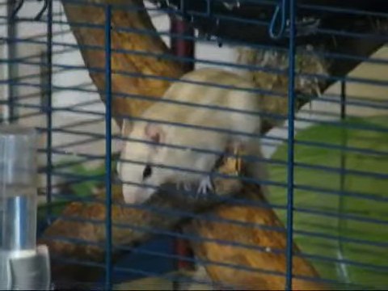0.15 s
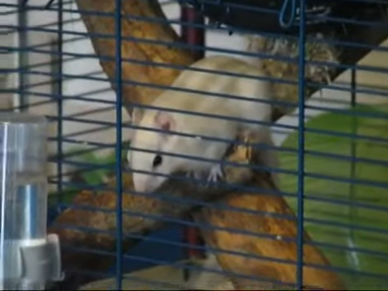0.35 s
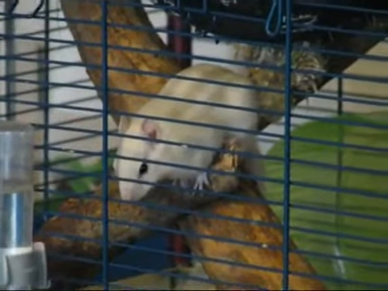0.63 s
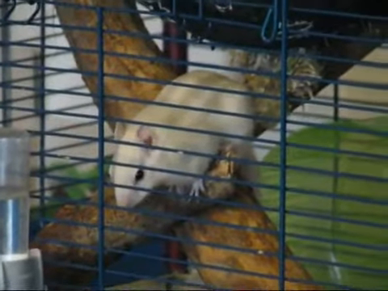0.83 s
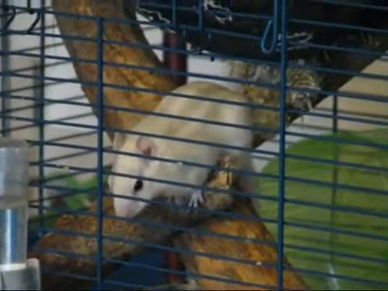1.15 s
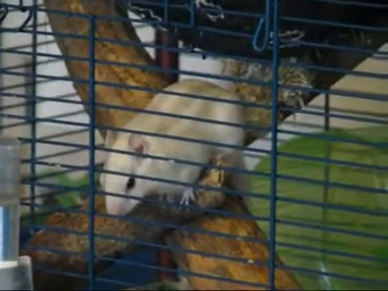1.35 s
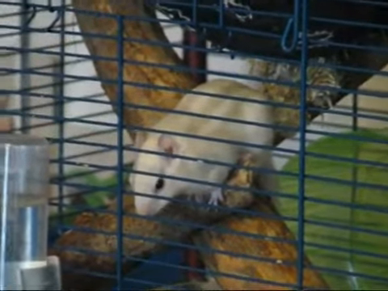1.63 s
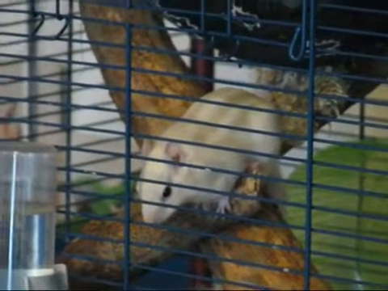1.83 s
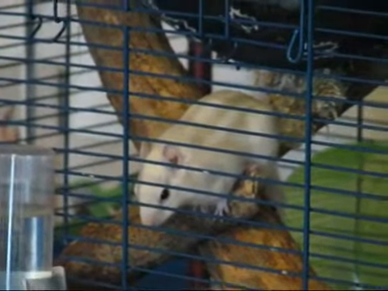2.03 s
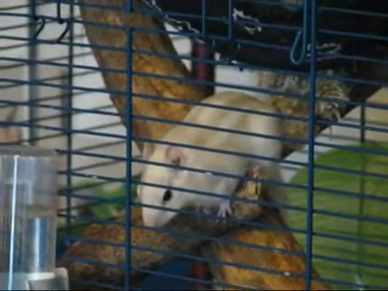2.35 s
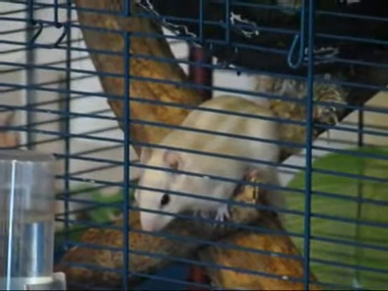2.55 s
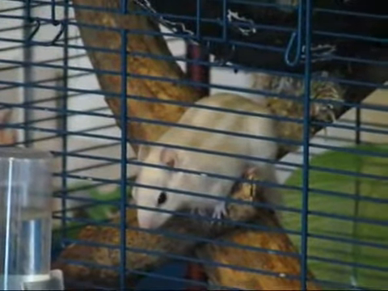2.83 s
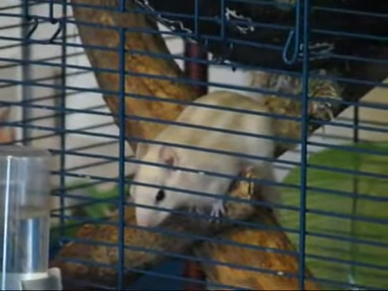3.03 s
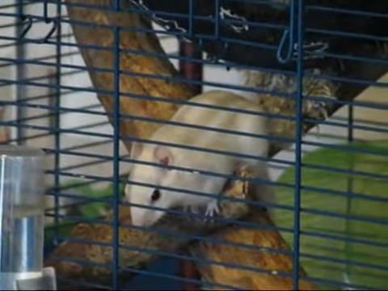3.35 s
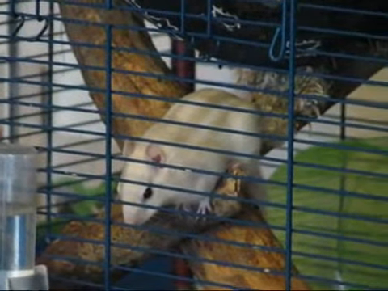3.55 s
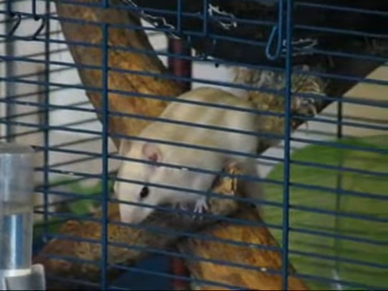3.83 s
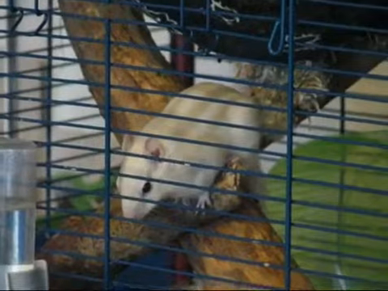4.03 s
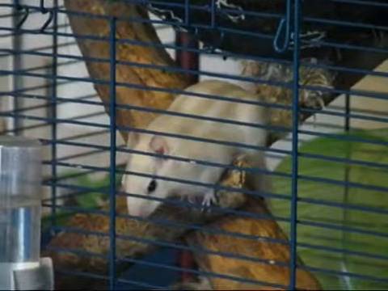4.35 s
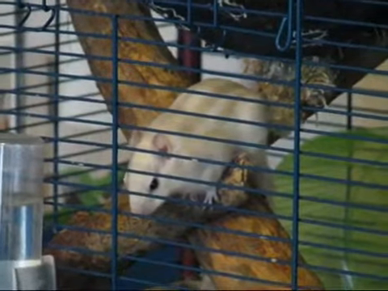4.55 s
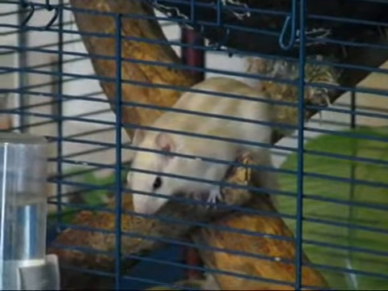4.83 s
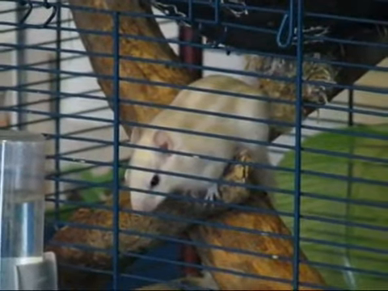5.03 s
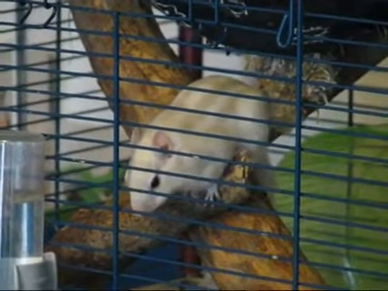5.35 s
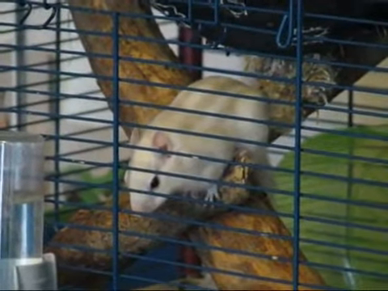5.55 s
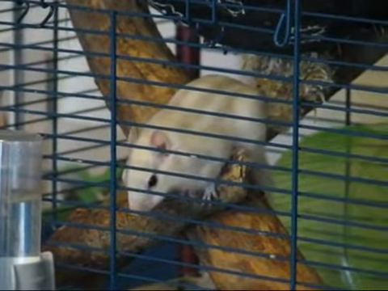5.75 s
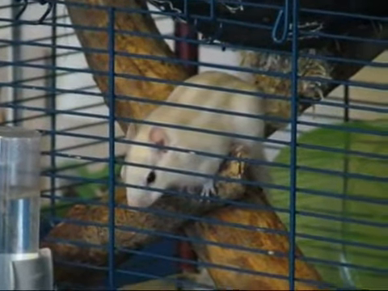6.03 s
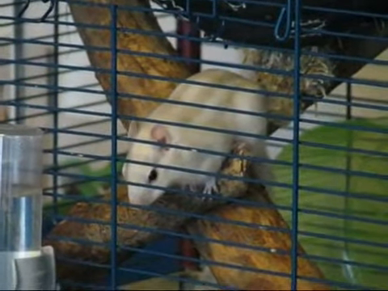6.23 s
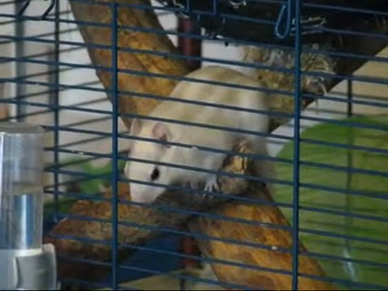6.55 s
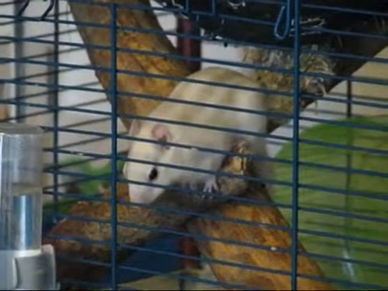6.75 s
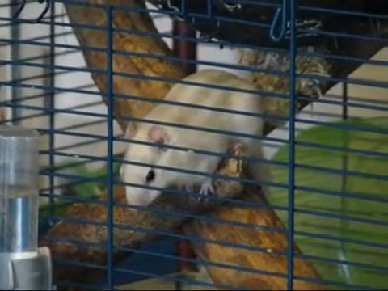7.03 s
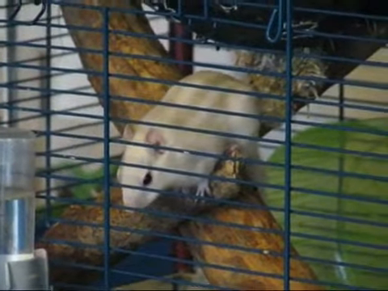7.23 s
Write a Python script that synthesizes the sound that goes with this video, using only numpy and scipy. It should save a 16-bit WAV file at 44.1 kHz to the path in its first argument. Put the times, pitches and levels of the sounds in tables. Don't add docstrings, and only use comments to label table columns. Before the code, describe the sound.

A small caged animal utters seven isolated, extremely high whistled chirps about a second or so apart. Each is a tiny arch, rising quickly and falling steeply, with slight breathiness and a short bright room ring. Behind lie low house rumble, soft hiss, distant appliance hum and a thin steady whine. A dull floor bump follows the fifth chirp. The close stereo microphone's automatic gain dips the background after every chirp.

```python
import sys
import numpy as np
from scipy import signal
from scipy.fft import rfft, irfft
from scipy.io import wavfile
from scipy.ndimage import uniform_filter1d

SR = 44100
rng = np.random.default_rng(int(sys.argv[2]) if len(sys.argv) > 2 else 0)


def volts(x):
    e = np.asarray(x, float) / 20
    return 10 ** e


def digitize_waveform(pressure):
    field = np.atleast_2d(pressure).T
    bounded = np.clip(field, -1, 1)
    quanta = np.round(bounded * 32767).astype(np.int16)
    wavfile.write(sys.argv[1], SR, quanta)


N = 325458

# (time of top [s], rise [s], fall [s], top pitch [Hz], end pitch [Hz])
CHIRP_ARCHES = [
    (0.5275, 0.012, .0255, 11080, 7506),
    (1.5589, .013, .023, 10530, 5589),
    (2.9487, .0145, 0.025, 10540, 6450),
    (4.4850, .0177, .0173, 9279, 6095),
    (5.3731, .014, .022, 10040, 5555),
    (6.6689, .013, .026, 10640, 5969),
    (7.2554, .0125, .022, 9731, 4975),
]
# (level [dB], onset softness [-], hang before drop [-], octave [dB], room [dB])
CHIRP_DELIVERY = [(-13.5, 1.4, 1.1, -43.5, 3), (-15, 1.6, .9, -20.5, 3.5), (-14.5, 1.9, .92, -22, 3),
                  (-13, .6, 1.1, -19.5, 1.98), (-14.5, 1.4, 1.05, -17.5, 3.5), (-14, 1.9, 1.6, -20.5, 4.5),
                  (-14.5, 1.35, .8, -18, -1)]
PITCH_DROP = [(.27, .2), (.57, 0.419), (.8, .85), (1.0, 1)]
# (pitch [Hz], gain [dB])
MOUTH_GAIN = [(5500, .5), (6400, -4), (7400, 0.5), (8400, 2.5), (9400, -4.5), (10000, 0), (10600, -1.5),
              (11100, 0.93)]
# (left delay [ms], right delay [ms], left level [dB], right level [dB])
SURFACE_ECHOES = [(2.4, 2.3, -18, -18), (2.8, 3.1, -17, -19), (4.0, 3.8, -19, -19), (6.5, 7.5, -17, -17),
                  (10.1, 9.8, -16, -16)]
# (frequency [Hz], left minus right [dB])
MIC_LEAN = [(5000, 5), (6500, 3), (7500, 6), (8500, 2), (9700, -4.5), (10800, -8.5), (12000, 1),
            (15000, 1.5)]
# (low edge [Hz], high edge [Hz], t60 [s], level [dB])
ROOM_TAIL_BANDS = [(2976, 4600, 0.27, -11.5), (6873, 7639, 0.2477, -20), (7714, 9500, 0.2548, -22),
                   (9220, 12000, 0.25, -31), (11470, 13500, 0.27, -18.5), (13400, 15500, 0.19, -23.5)]
# (time [s], frequency [Hz], level [dB], t60 [s])
BUMP_MODES = [
    (1.929, 95, -49, 0.41),
    (5.539, 103.4, -43.5, 0.55),
    (5.57, 78.5, -34, 0.15),
    (5.621, 40.34, -43, 0.64),
]
# (on [s], off [s], level [dB])
HUM_RUNS = [
    (4.8, 5.15, -62),
    (5.85, 7.25, -59.5),
]
# (on [s], off [s], level [dB])
WHISTLE_RUNS = [
    (-.2, 1.38, -77.5),
    (2.35, 3.3, -76.5),
]
# (frequency [Hz], width [Hz], level [dB])
AIR_DRONES = [(37.2, 9.5, -62.5), (95, 17, -66.5), (165.3, 63, -65.5), (211.9, 18, -71), (742, 40, -77.5),
              (1030.1, 130, -74.5), (1819, 440, -76), (2342, 250, -78.5), (4184.8, 1400, -78.5),
              (7143, 200, -86.5)]
# (frequency [Hz], density [dB per Hz])
HOUSE_SPECTRUM = [(12, -30), (20, -1.5), (43, -11), (65, -12.5), (93, -9.5), (216, -8.5), (460, -15.5),
                  (1040, -16), (1230, -19.5), (2210, -22.5), (6220, -29.5), (8230, -29), (8950, -25.5),
                  (14800, -43), (16100, -58)]
# (time [s], level [dB])
HOUSE_LEVEL = [(0.0, -60), (2.3, -59), (3.3, -60.5), (7.38, -61)]
# (frequency [Hz], correlation [-])
HOUSE_LIKENESS = [(60, 0.98), (150, 1), (380, 0.84), (950, 0.7517), (2380, 0.35), (5980, 0.13),
                  (15000, 0.11)]
# (frequency [Hz], rms level [dB])
WHINE_LINES = [(8006.4, -71.5), (7840, -93.5), (8043, -91.5)]


def squirrel():
    out = np.zeros((2, N + 40000))
    for row, delivery in zip(CHIRP_ARCHES, CHIRP_DELIVERY):
        at, sound = chirp(row, delivery, room_tail())
        out[:, at:at + sound.shape[1]] += sound
    return out[:, :N]


def chirp(row, delivery, tail):
    level_db, softness, hang, octave_db, room_db = delivery
    octave_tilt_db = -22
    breath_db, rasp_db, rasp_hz, grit_db = -36.5, -28, 3200, 4.5
    perch_ms, perch_left_db, perch_right_db = 1.437, -1.5, -0.5
    pan_db = -2.67

    t = row[0] - 0.022 + np.arange(4096) / SR
    pitch_hz, level = arch(t, row, level_db, softness, hang)
    phase = 2 * np.pi * np.cumsum(pitch_hz) / SR
    octave = level * volts(octave_db + octave_tilt_db * np.log2(pitch_hz / 6000))

    grit = volts(grit_db * np.repeat(rng.standard_normal(len(t) // 32), 32))
    lowpass = signal.butter(4, rasp_hz, fs=SR, output="sos")
    flutter = rms_one(signal.sosfilt(lowpass, rng.standard_normal(len(t))))
    breath = volts(breath_db) * grit * level * bandpass(rng.standard_normal(len(t)), 1, 1200, 7000)

    def late(v, ms):
        return np.interp(t - ms / 1000, t, v)

    def heard(ms):
        angle = late(phase, ms)
        return late(level, ms) * np.sin(angle) + late(octave, ms) * np.sin(2 * angle)

    direct = heard(0) * (1 + volts(rasp_db) * flutter) + breath
    perch = heard(perch_ms)
    left = direct + volts(perch_left_db) * perch
    right = direct + volts(perch_right_db) * perch
    for left_ms, right_ms, left_db, right_db in SURFACE_ECHOES:
        left = left + volts(left_db) * heard(left_ms)
        right = right + volts(right_db) * heard(right_ms)
    near = np.array([left, right]) * volts([[pan_db / 2], [-pan_db / 2]])

    wet = volts(room_db) * signal.fftconvolve(heard(0)[None], tail, axes=1)
    wet[:, :len(t)] += near
    size = wet.shape[1]
    lean_db = at_hz(MIC_LEAN, np.fft.rfftfreq(size, 1 / SR) + 1) / 2
    return round(t[0] * SR), irfft(rfft(wet) * volts([lean_db, -lean_db]), size)


def arch(t, row, level_db, softness, hang):
    top_s, rise_s, fall_s, top_hz, end_hz = row
    start_share = 0.72
    linger_s, linger_db = 0.0058, -18
    start_db, catch_s, catch_db, attack_s = -35.5, 0.0025, -8, 0.007
    start, end = top_s - rise_s, top_s + fall_s

    climbed = np.sin(np.pi / 2 * np.clip((t - start) / rise_s, 0, 1)) ** softness
    when, down = np.transpose([(0, 0), *PITCH_DROP])
    drop_s = top_s + fall_s * when
    dropped = np.interp(t, [*drop_s, drop_s[-1] + linger_s], [*down ** hang, 1])
    hz = top_hz * (start_share + (1 - start_share) * climbed) - (top_hz - end_hz) * dropped
    pitch_hz = uniform_filter1d(uniform_filter1d(hz, size=110), size=110)

    caught = start + catch_s
    effort_s = [start, caught, caught + attack_s * softness, end, end + linger_s, end + 2 * linger_s]
    effort_db = np.interp(t, effort_s, [start_db, catch_db * softness, 0, 0, linger_db, -65], left=-75)
    total_db = level_db + effort_db + at_hz(MOUTH_GAIN, pitch_hz)
    return pitch_hz, volts(uniform_filter1d(total_db, size=60))


def room_tail():
    build_s, likeness = 0.0062, 0.2
    t = np.arange(28673) / SR
    mid, side = rng.standard_normal((2, len(t)))
    pair = stereo(mid, side, likeness) / np.sqrt(2)
    out = 0
    for low_hz, high_hz, t60_s, db in ROOM_TAIL_BANDS:
        out = out + volts(db - 60 * t / t60_s) * bandpass(pair, 2, low_hz, high_hz)
    return out * (1 - np.exp(-t / build_s))


def appliances():
    hum_hz, whistle_hz, whistle_width_hz = 73.093, 2209.4, 80
    t, white = np.arange(N) / SR, rng.standard_normal(N)
    drones = sum(volts(db) * rms_one(resonance_twice(white, hz, width_hz)) for hz, width_hz, db in AIR_DRONES)

    hum_phase = 2 * np.pi * np.cumsum(hum_hz + 1.2 * drift(1.5)) / SR
    hum = running(HUM_RUNS, idle_db=-85.5, ramp_s=0.19) * np.sin(hum_phase) * np.sqrt(2)
    thin = rms_one(resonance_twice(white, whistle_hz, whistle_width_hz))
    whistle = running(WHISTLE_RUNS, idle_db=-84, ramp_s=0.281) * thin

    bump = 0
    for at_s, hz, db, t60_s in BUMP_MODES:
        since = np.maximum(t - at_s, 0)
        swell = 1 - np.exp(-since / 0.0117)
        bump = bump + volts(db - 60 * since / t60_s) * swell * np.sin(2 * np.pi * hz * since)

    aside = volts(-16.5) * np.roll(drones, 9000) * [[1], [-1]]
    return drones + aside + hum + whistle + bump


def house(patchy_db):
    air_low_hz, air_high_hz, air_db = 13000, 15700, -81.5
    out, together = 0, drift(3.5)
    edges_hz = 18 * 2 ** np.arange(0, 10.1, 0.5)
    white = rng.standard_normal((2, 2, N))
    for k, (low_hz, high_hz) in enumerate(zip(edges_hz, edges_hz[1:])):
        mid, side = bandpass(white[k % 2], 2, low_hz, high_hz)
        hz = np.sqrt(low_hz * high_hz)
        flicker_db = patchy_db * (1.1 * together + drift(7.2))
        gain = volts(at_hz(HOUSE_SPECTRUM, hz) + flicker_db)
        out = out + gain * stereo(mid, side, at_hz(HOUSE_LIKENESS, hz))
    air = bandpass(rng.standard_normal((2, N)), 4, air_low_hz, air_high_hz)
    return in_time(HOUSE_LEVEL) * rms_one(out) + volts(air_db) * rms_one(air)


def whine():
    t = np.arange(N) / SR
    tone = 0
    for hz, db in WHINE_LINES:
        tone = tone + volts(db + 0.95 * drift(3)) * np.sqrt(2) * np.sin(2 * np.pi * hz * t)
    return tone * volts([[-1.5], [1.5]])


def running(rows, idle_db, ramp_s):
    t = np.arange(N) / SR
    gain = volts(idle_db)
    for on_s, off_s, db in rows:
        inside = np.clip(np.minimum(t - on_s, off_s - t) / ramp_s + 0.5, 0, 1)
        gain = gain + volts(db) * np.sin(np.pi / 2 * inside) ** 2
    return gain


def at_hz(points, hz):
    table_hz, value = np.transpose(points)
    return np.interp(np.log(hz), np.log(table_hz), value)


def in_time(rows):
    return volts(np.interp(np.arange(N) / SR, *np.transpose(rows)))


def rms_one(x):
    return x / np.sqrt(np.mean(x ** 2) + 1e-20)


def bandpass(x, order, low_hz, high_hz):
    return signal.sosfilt(signal.butter(order, [low_hz, high_hz], "band", fs=SR, output="sos"), x)


def stereo(mid, side, likeness):
    alike = np.clip(likeness, -1, 1)
    return np.sqrt(1 + alike) * mid + np.sqrt(1 - alike) * side * [[1], [-1]]


def drift(rate_hz):
    r = np.exp(-80 * np.pi * rate_hz / SR)
    slow = signal.lfilter([1], [1, -2 * r, r * r], rng.standard_normal(N // 40 + 2002))[2000:]
    return np.interp(np.arange(N) / 40, np.arange(len(slow)), rms_one(slow))


def resonance_twice(x, hz, width_hz):
    r = np.exp(-np.pi * width_hz / SR)
    b = [(1 - r * r) / 2, 0, (r * r - 1) / 2]
    a = [1, -2 * r * np.cos(2 * np.pi * hz / SR), r * r]
    return signal.lfilter(b, a, signal.lfilter(b, a, x))


def scene():
    background = house(patchy_db=0.88) + appliances()
    return squirrel() + background * volts([[0.5], [-0.5]]) + whine()


def gain_control(x, knee_db, share, release_db_s, attack_hz):
    level_db = 10 * np.log10(uniform_filter1d(np.mean(x ** 2, axis=0), size=220) + 1e-12)
    ramp_db = release_db_s * np.arange(N) / SR
    cut_db = np.maximum.accumulate(share * np.maximum(level_db - knee_db, 0) + ramp_db) - ramp_db
    r = np.exp(-2 * np.pi * attack_hz / SR)
    return x * volts(-signal.lfilter([(1 - r) ** 2], [1, -2 * r, r * r], cut_db))


def masked_out(x):
    below_db, below_db_khz = 14, 22
    over_db, over_db_khz = 30, 2.5
    sparse_db = 1
    hz, t, frames = signal.stft(x, SR, nperseg=1536)
    power, khz = abs(frames) ** 2 + 1e-20, hz[:, None] / 1000
    level_db = 10 * np.log10(uniform_filter1d(np.mean(power, axis=0), size=11, axis=0))
    masker_db = np.where(khz > 4, level_db, -200)
    upward = np.maximum.accumulate(masker_db + over_db_khz * khz) - over_db_khz * khz - over_db
    downward = np.maximum.accumulate((masker_db - below_db_khz * khz)[::-1])[::-1]
    downward = downward + below_db_khz * khz - below_db
    above_db = level_db - np.maximum(upward, downward)

    band = np.arange(len(hz)) // 12
    luck_db = rng.normal(0, 4, (band[-1] + 1, len(t)))
    band_db = np.maximum.reduceat(above_db, np.arange(0, len(hz), 12)) + luck_db
    band_kept = (band_db[band] > 2) | (above_db > 12)
    quiet_and_high = (khz > 9) & (level_db < -85)
    line_kept = ~quiet_and_high | (10 * np.log10(power) > level_db - sparse_db)
    return signal.istft(frames * band_kept * line_kept, SR, nperseg=1536)[1][:, :N]


def roll_off(x):
    return signal.sosfilt(signal.butter(12, 16270, fs=SR, output="sos"), x)


def record(dry):
    ducked = gain_control(dry, knee_db=-27.5, share=0.6077, release_db_s=40.0, attack_hz=7.7)
    rounded = 1.31 * np.tanh(ducked / 0.81)
    limited = signal.sosfilt(signal.cheby2(10, 60, 16900, fs=SR, output="sos"), rounded)
    mix = masked_out(limited)
    return roll_off(mix)


dry = scene()
out = record(dry)
digitize_waveform(out)
```